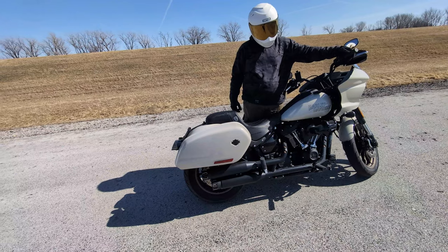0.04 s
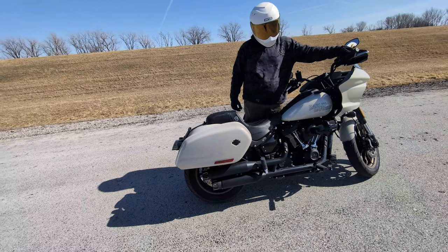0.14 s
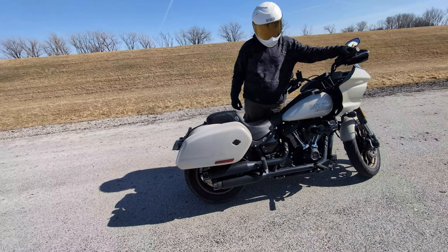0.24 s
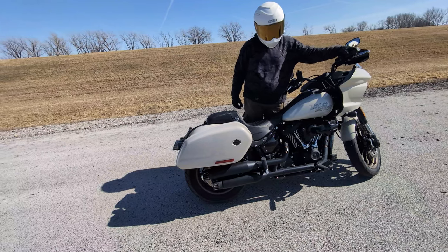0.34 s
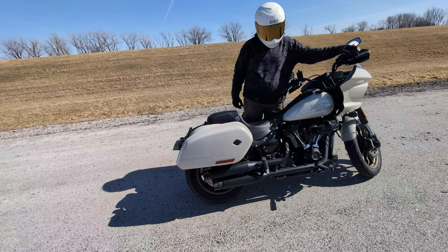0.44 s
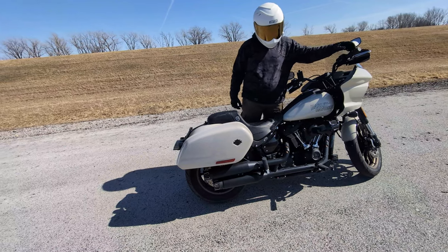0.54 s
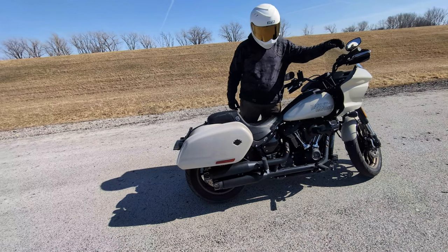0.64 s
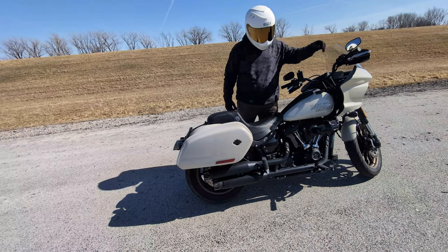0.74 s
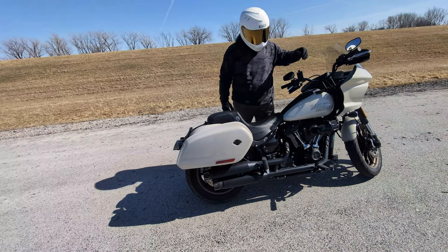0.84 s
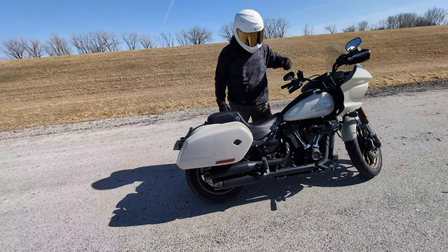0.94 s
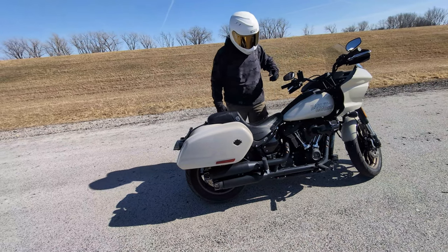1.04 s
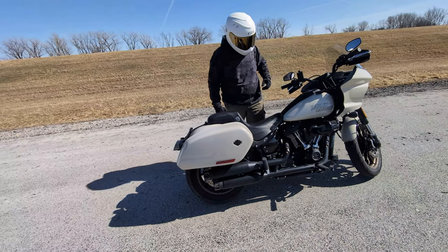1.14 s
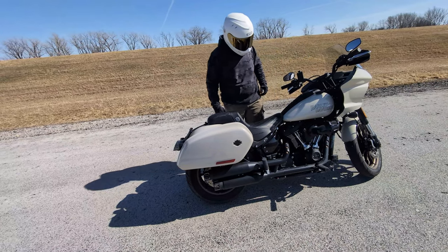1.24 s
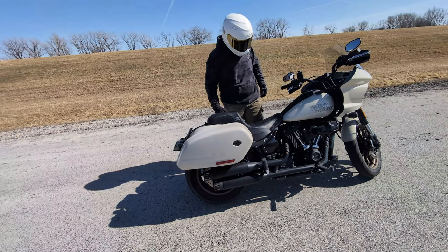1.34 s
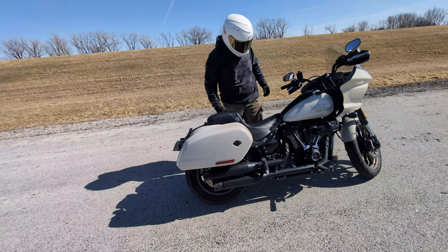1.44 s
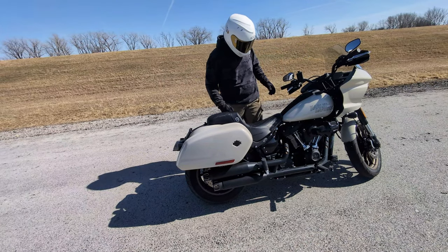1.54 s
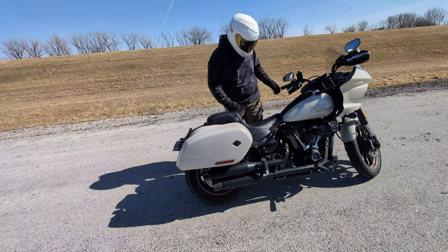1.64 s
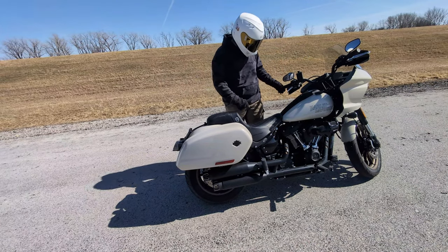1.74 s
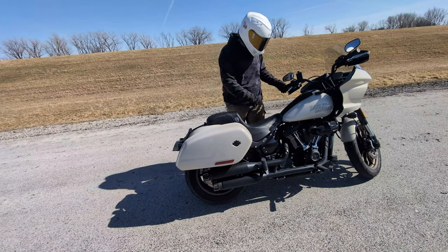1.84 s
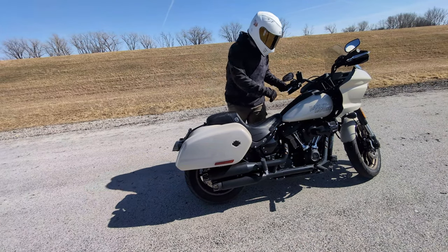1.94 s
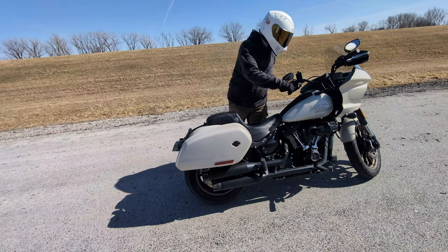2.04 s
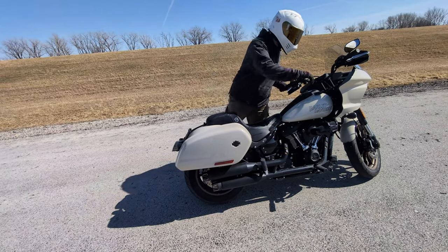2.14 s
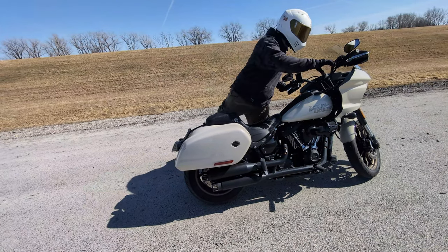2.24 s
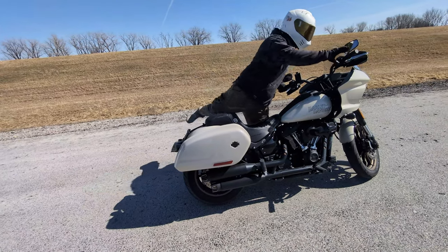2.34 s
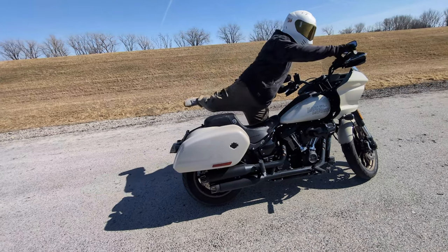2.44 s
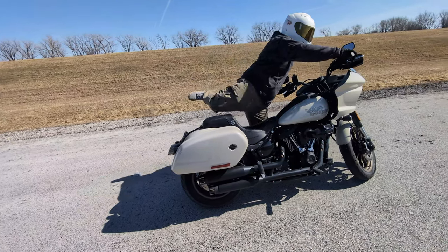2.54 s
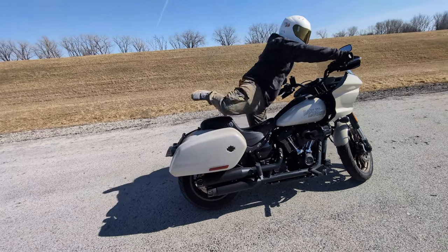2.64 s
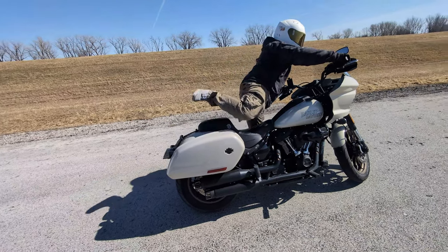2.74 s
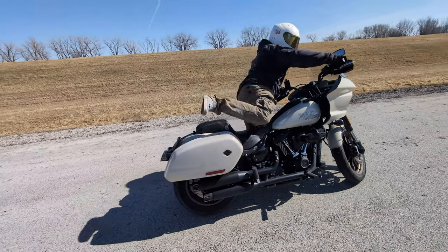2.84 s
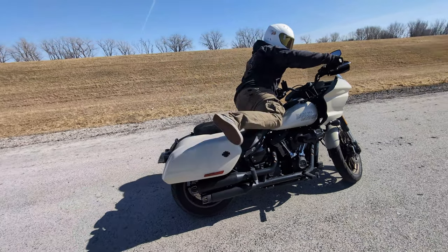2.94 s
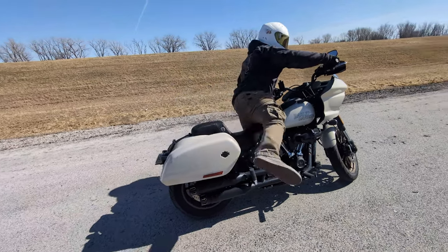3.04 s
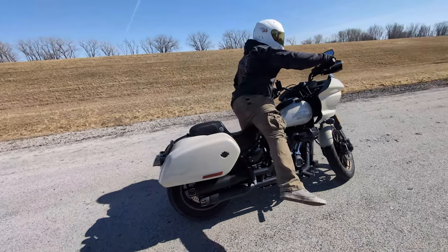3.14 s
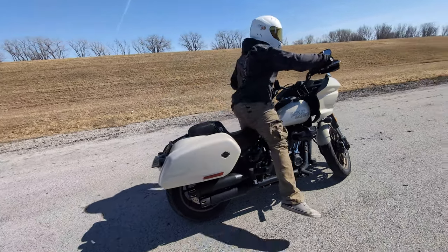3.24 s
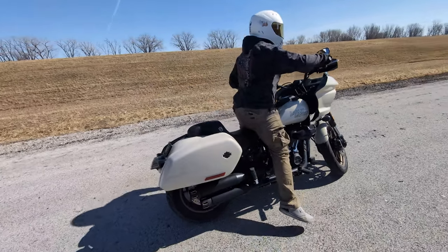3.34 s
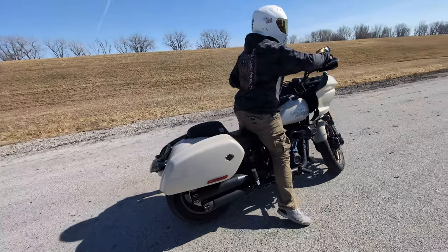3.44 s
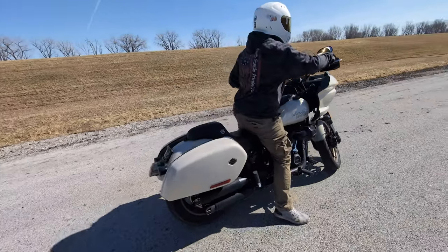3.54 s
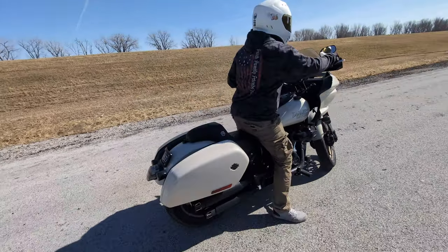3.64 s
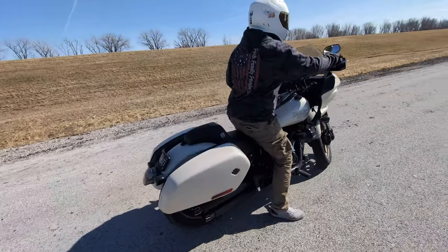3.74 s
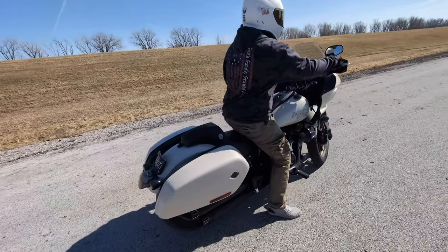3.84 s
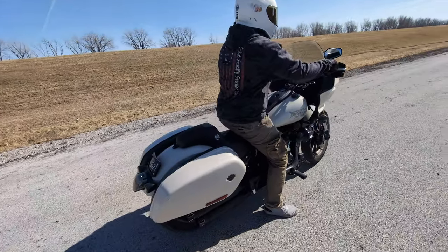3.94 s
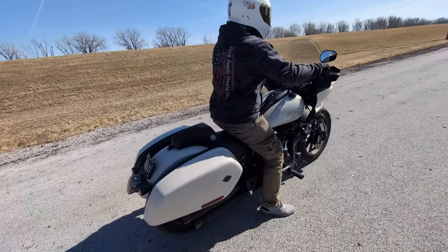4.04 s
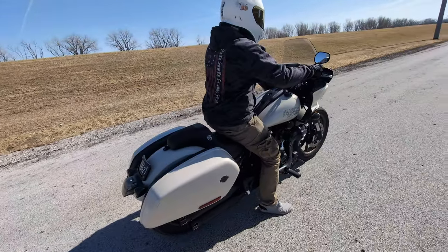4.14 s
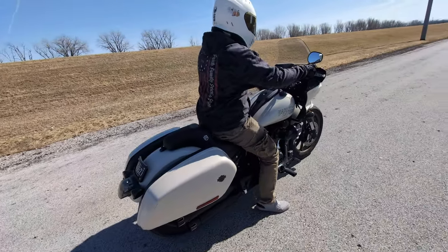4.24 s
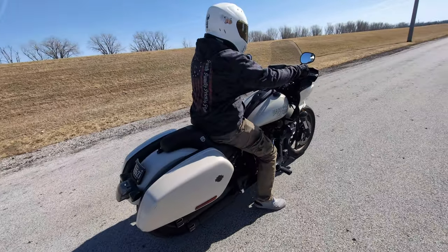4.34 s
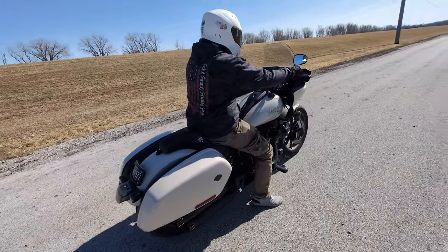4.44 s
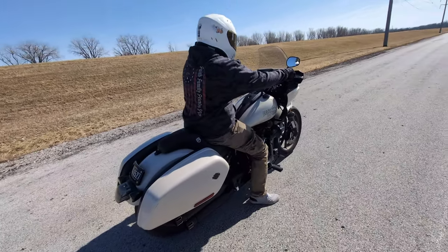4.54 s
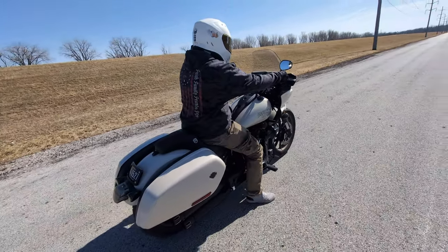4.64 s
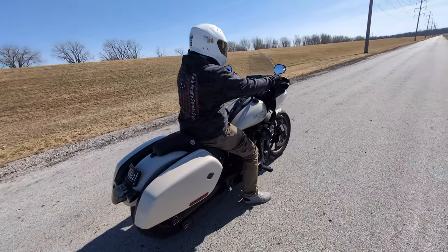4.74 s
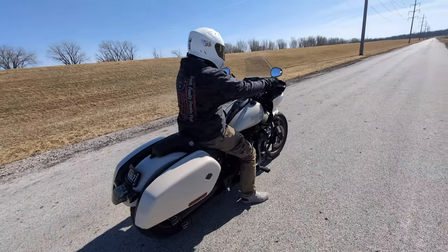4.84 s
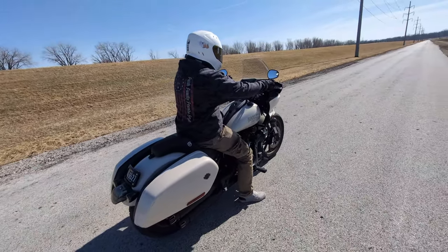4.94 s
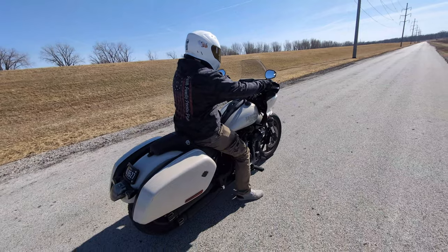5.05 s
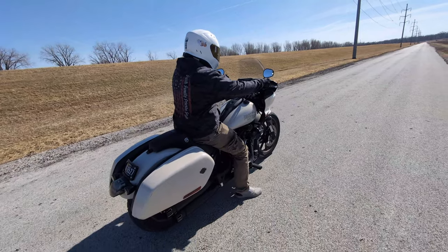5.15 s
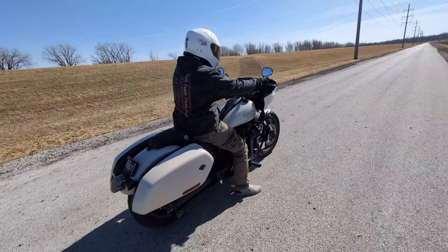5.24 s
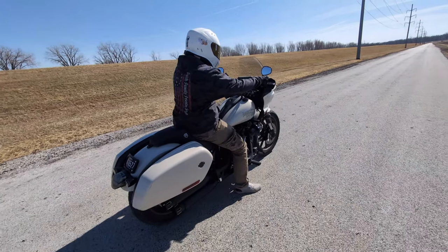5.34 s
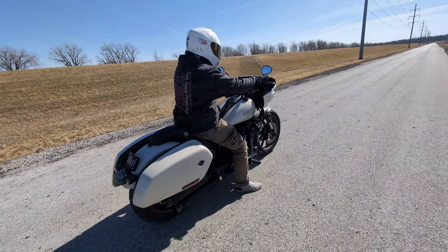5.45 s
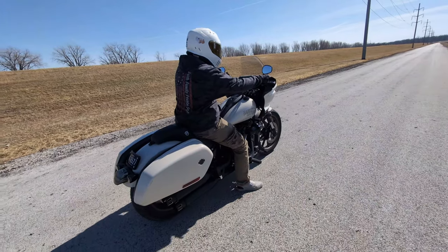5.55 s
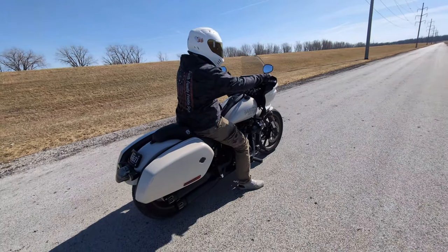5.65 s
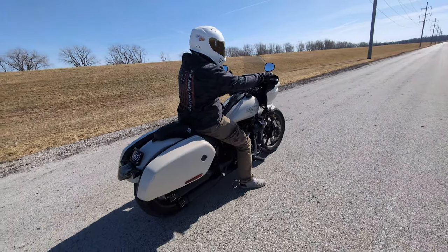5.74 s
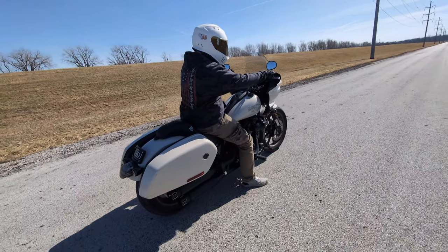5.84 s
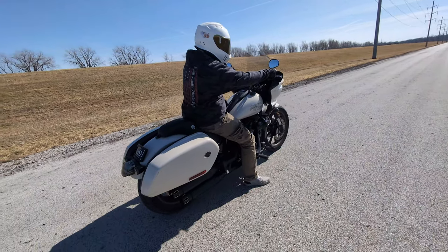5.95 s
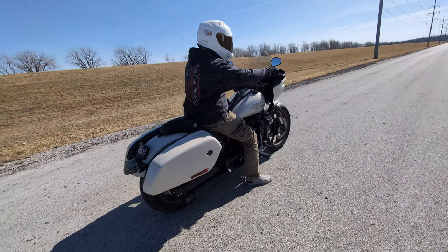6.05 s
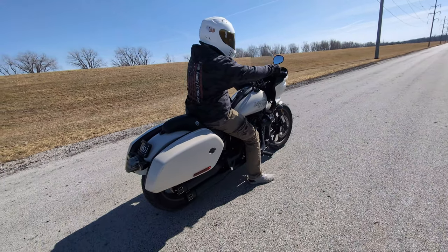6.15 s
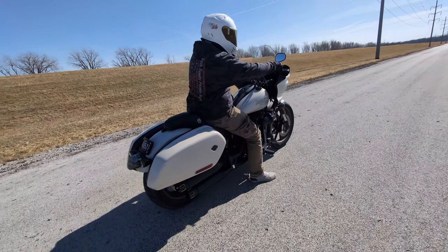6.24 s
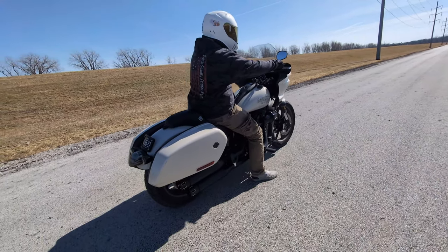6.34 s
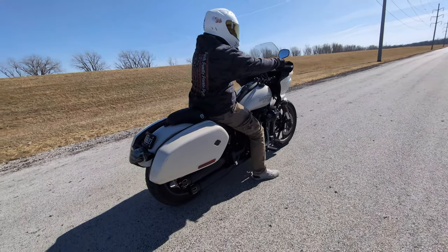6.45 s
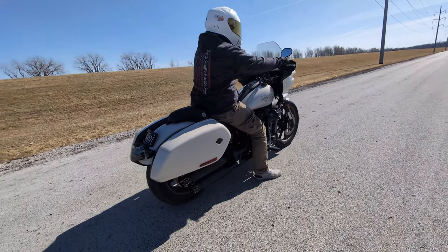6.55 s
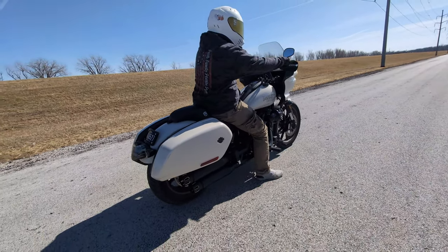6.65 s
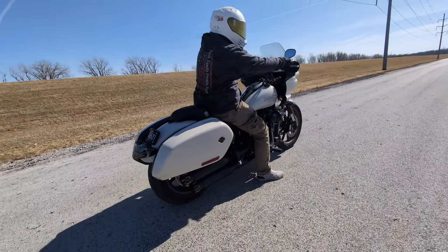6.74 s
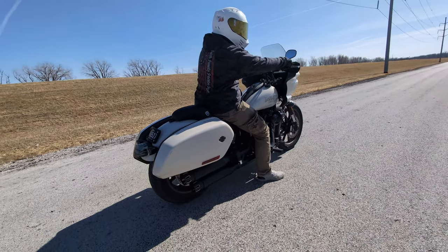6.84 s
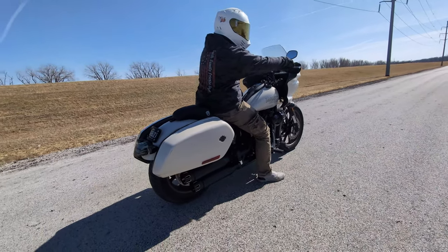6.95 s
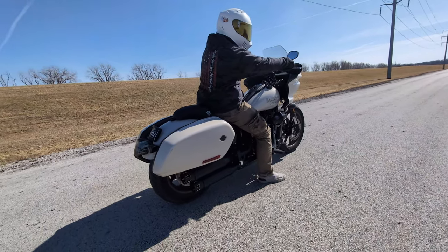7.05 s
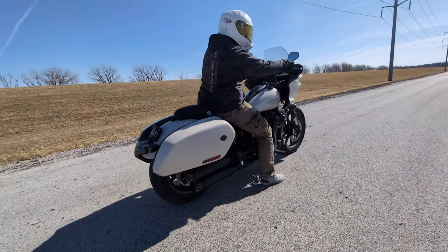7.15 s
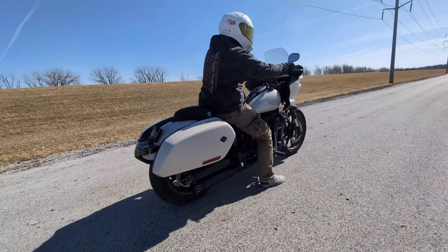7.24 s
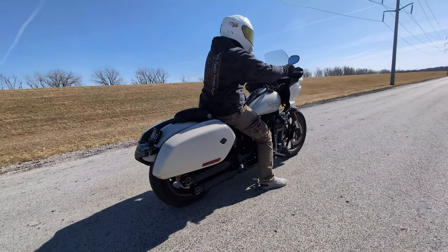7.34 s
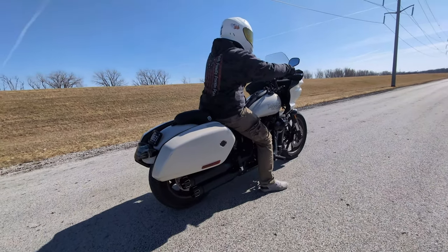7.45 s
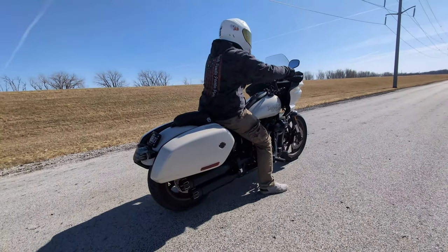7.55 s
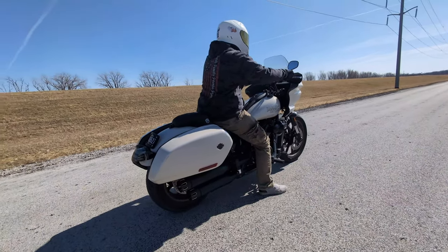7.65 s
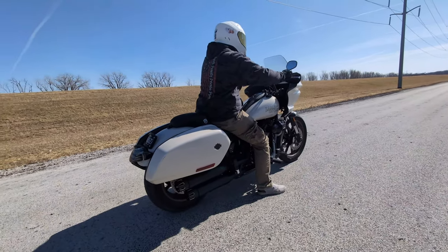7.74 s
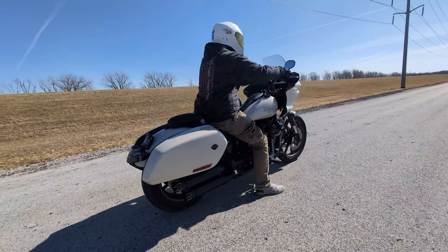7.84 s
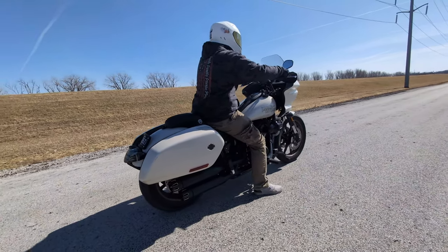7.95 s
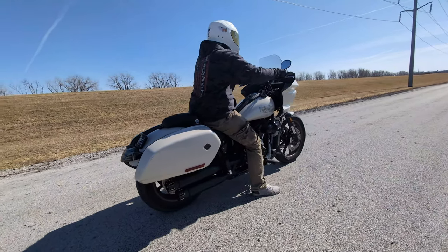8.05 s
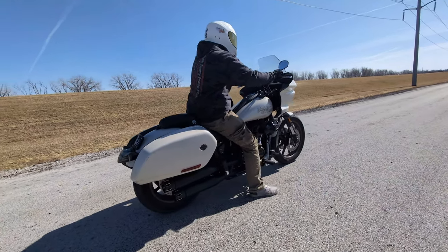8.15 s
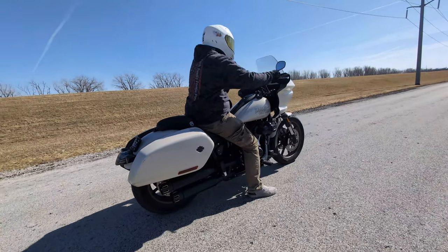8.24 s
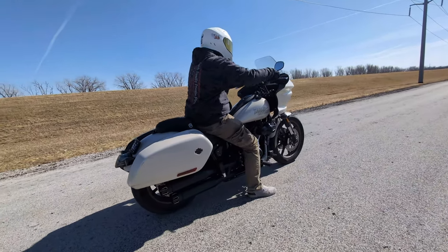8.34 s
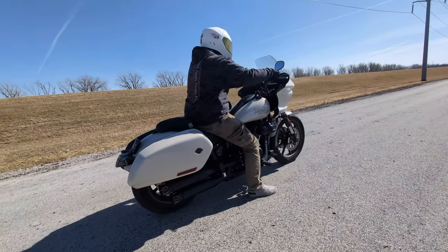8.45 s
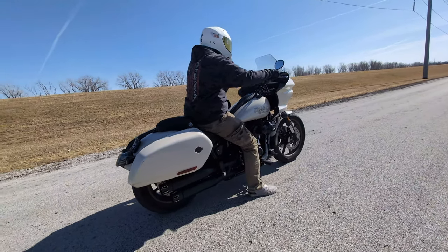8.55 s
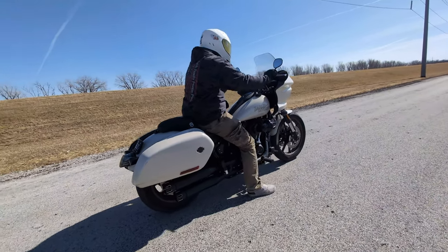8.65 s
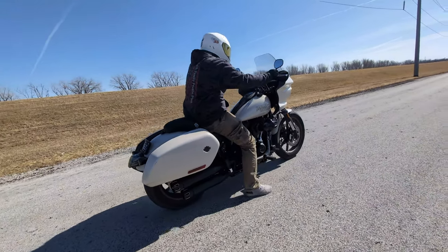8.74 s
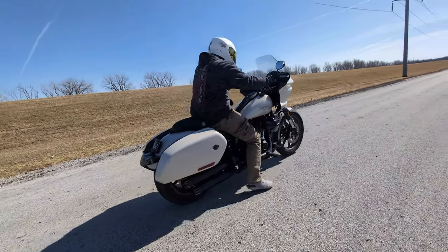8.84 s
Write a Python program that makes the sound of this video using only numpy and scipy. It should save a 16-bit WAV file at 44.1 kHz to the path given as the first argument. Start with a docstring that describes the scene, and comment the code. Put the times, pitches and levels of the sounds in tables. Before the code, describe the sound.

A loud V-twin motorcycle gives one throaty blip, crackles down to a loping idle, clunks into gear, then revs hard with sharp pops.

```python
"""Big V-twin blipped, idling and revved

A V-twin motorcycle with open mufflers is blipped once, sinks to a loping idle, clunks into gear and is revved again.
Two unevenly spaced exhaust pulses ring modelled pipes and merge into a roar; shaped noise makes rush, cracks and pops.
Valves tick and pistons rap as pulsed noise, knocks and the side stand ring briefly, a whine falls, the drive squeals.
Crank speed, throttle and the microphone's line to the pipes set most levels; a limiter turns loud passages down."""
import sys
import numpy as np
from scipy import signal
from scipy.fft import rfft, irfft, next_fast_len
from scipy.io import wavfile
from scipy.ndimage import uniform_filter1d

SR = 44100
rng = np.random.default_rng(int(sys.argv[2]) if len(sys.argv) > 2 else 0)


def bounce(signal):
    """Save signal as a 16-bit WAV file at the path given by the first command-line argument."""
    frames = np.transpose(np.atleast_2d(signal))
    limited = np.clip(frames, -1, 1)
    pcm = np.round(limited * 32767).astype(np.int16)
    wavfile.write(sys.argv[1], SR, pcm)


N = 392049
TIME = np.arange(N) / SR
IDLE_RPM = 980
REAR_LAG = .402   # share of the four-stroke cycle from the front to the rear cylinder


def from_db(db):
    """Turn decibels into a gain."""
    return 10 ** (np.asarray(db) / 20)


def rms_one(x):
    """Scale to unit power."""
    return x / np.sqrt(np.mean(x ** 2) + 1e-20)


def in_time(rows):
    """Read each column of a curve at every sample."""
    s, *columns = np.transpose(rows)
    return [np.interp(TIME, s, column) for column in columns]


def at_hz(points, hz):
    """Read a spectrum in dB; beyond its ends it falls by a further 48 dB per octave."""
    f, value = np.transpose(points)
    octaves_beyond = np.log2(hz / np.clip(hz, f[0], f[-1]))
    return np.interp(np.log(hz), np.log(f), value) - 48 * np.abs(octaves_beyond)


def drift(rate_hz):
    """Wander at random, in straight lines between chance values; spread 1."""
    steps = TIME * rate_hz
    return rms_one(np.interp(steps, np.arange(8192), rng.standard_normal(8192)))


def cut(x, hz, kind, order=2):
    """Butterworth low-pass or high-pass filter."""
    return signal.sosfilt(signal.butter(order, hz, kind, fs=SR, output="sos"), x)


def resonance(x, hz, width_hz):
    """Ring at one pitch: the same two-pole resonance twice over, with gain 1 on top."""
    r = np.exp(-np.pi * width_hz / SR)
    top = np.array([1, 0, -1]) * (1 - r * r) / 2
    bottom = [1, -2 * r * np.cos(2 * np.pi * hz / SR), r * r]
    return signal.lfilter(top, bottom, signal.lfilter(top, bottom, x))


def evened(x, size=5400):
    """Hold the power near 1 over a window of samples, by default one idle cycle."""
    power = uniform_filter1d(uniform_filter1d(x ** 2, size=size), size=size // 2)
    return x / np.sqrt(np.abs(power) + 1e-12)


# How alike left and right are at each pitch: pitch_hz [Hz], likeness [-1 to 1]
LIKENESS = [(60, 0.31), (200, 0.98), (700, 0.74), (1300, 0.72), (2400, 0.16), (4400, -0.13), (8000, -0.026),
            (15000, 0.043)]


def noise(colour, tilt_db=0, size=N):
    """Stereo turbulence of a given colour, rms 1; its likeness between the ears depends on pitch."""
    length = next_fast_len(size, True)
    hz = np.maximum(np.arange(length // 2 + 1) * SR / length, 1)
    alike = np.clip(np.interp(hz, *np.transpose(LIKENESS)), -1, 1)
    mid, side = rfft(rng.standard_normal((2, length)))
    pair = np.sqrt(1 + alike) * mid + np.sqrt(1 - alike) * side * [[1], [-1]]
    shape = from_db(at_hz(colour, hz) + tilt_db * np.log2(hz))
    return rms_one(irfft(pair * shape, length)[:, :size])


def strokes(cycle, start, width, uneven_db):
    """One pulse per engine cycle: a fast rise and slower fall in crank angle, each with its own strength."""
    turn, angle = np.divmod(cycle - start + 2, 1)
    strength = from_db(uneven_db * rng.standard_normal(256))
    u = angle / width
    return strength[turn.astype(int)] * u * u * np.exp(2 - 2 * u)


def burst(s, rise, decay):
    """Envelope of a sudden blow, height 1; rise and decay in seconds."""
    out, first = np.zeros(N), int(s * SR)
    age = TIME[:min(N - first, SR // 4)]
    shape = (1 - np.exp(-(age / rise) ** 2)) * np.exp(-age / decay)
    out[first:first + len(age)] = shape / shape.max()
    return out


# Colour of the low eddies: pitch_hz [Hz], level_db [dB, relative]
RUMBLE = [(20, -20), (40, -38), (80, 7), (200, -0.5), (400, -27)]


def rumble(rush_db):
    """Eddies in the exhaust stream make a low noise."""
    return from_db(rush_db) * noise(RUMBLE)


# Side stand and gearbox knocks: start_s [s], level_db [dB, envelope peak], decay_s [s],
# tilt_db [dB per octave, towards the treble]
KNOCKS = [(5.388, -29.5, 0.007, 3.5), (6.724, -22, 0.0094, -0.2), (6.743, -37.5, 0.059, 0.5),
          (6.773, -32.5, 0.015, 0)]
# Colour of the knocking metal: pitch_hz [Hz], level_db [dB, relative]
KNOCK = [(300, 12), (650, 18.5), (1000, 15), (1700, 14.5), (2200, 9), (3000, 10), (4200, 7), (5500, 4),
         (7000, 1), (15000, -7)]


def knocks():
    """Heavy metal parts meet: dense modes, made as coloured noise, die quickly."""
    out = np.zeros((2, N))
    for s, db, decay, tilt_db in KNOCKS:
        span = slice(int(s * SR), int(s * SR) + SR // 4)
        out[:, span] += from_db(db) * burst(s, 0.00071, decay)[span] * noise(KNOCK, tilt_db, size=SR // 4)
    return out


# Side stand ringing as it snaps up: pitch_hz [Hz], level_db [dB], decay_s [s]
STAND = [(1100, -32, .008), (1230, -44, .012), (2920, -31, .007), (3200, -42, .014), (5480, -32, .005),
         (5700, -51, .012)]


def side_stand(s=5.389):
    """The stand's spring pulls it against its stop, and a few tones ring briefly."""
    return sum(from_db(db) * burst(s, 0.0017, decay) * np.sin(2 * np.pi * hz * TIME + drift(190))
               for hz, db, decay in STAND)


# The drive squeals as the load comes on: start_s [s], length_s [s], level_db [dB]
SQUEALS = [(8.654, 0.041, -12.5), (8.68, 0.1, -20.5), (8.779, 0.0386, -15.5), (8.796, 0.19, -14)]
SQUEAL_HZ, SQUEAL_SAG_HZ = 1344, 99.7   # pitch when barely gripping; its fall at the hardest grip


def squeal(rough=0.0302, octave_db=-12):
    """Rubber sticks and slips under load: a rough tone with its octave, flatter the harder it grips."""
    grip = sum(from_db(db) * np.sin(np.pi * np.clip((TIME - s) / length, 0, 1)) for s, length, db in SQUEALS)
    hz = SQUEAL_HZ - SQUEAL_SAG_HZ * grip / grip.max()
    phase = 2 * np.pi * np.cumsum(hz * (1 + rough * drift(350))) / SR
    octave = from_db(octave_db + 3 * drift(90)) * np.sin(2 * phase + drift(500))
    return grip * from_db(2 * drift(150)) * rms_one(np.sin(phase) + octave)


# A whine falls as the engine winds down: start_s [s], pitch_hz [Hz], level_db [dB, before the casing]
WHINE = [(1.25, 2395, -53), (1.5, 2050, -51), (1.65, 1845, -61), (1.8, 1650, -51), (1.9, 1540, -57),
         (2.05, 1350, -83)]
# The casing that its harmonics glide through: pitch_hz [Hz], level_db [dB]
CASING = [(1400, -3), (1680, 1.5), (2000, -1), (3400, -17), (4050, -10), (4700, -25), (5600, 4),
          (6400, -22), (7500, -14), (8500, -22)]


def whine(rough=.026, flutter_db=2):
    """A rough, fluttering tone slides down; its harmonics light up in turn."""
    hz, db = in_time(WHINE)
    phase = 2 * np.pi * np.cumsum(hz * (1 + rough * drift(500))) / SR
    tone = sum(from_db(at_hz(CASING, k * hz)) * np.sin(k * phase) for k in range(1, 5))
    sounding = (TIME > WHINE[0][0]) & (TIME < WHINE[-1][0])
    return sounding * from_db(db + flutter_db * drift(50.4)) * tone


# Colour of the valve ticks: pitch_hz [Hz], level_db [dB, relative]
TICK = [(2000, -29), (3200, 10), (4500, 2.5), (6500, 0), (8200, 6.5), (9500, 4), (11400, 15.5),
        (13000, 5.5), (16000, -2)]


def valves(cycle, level_db):
    """The valve train ticks at fixed cam angles, as gated noise."""
    # (place in the cycle, length as a share of the cycle, dB)
    cams = [(0.0007, 0.026, 17.2), (0.373, 0.058, 12.0), (0.11, 0.018, 7.1)]
    gate = sum(from_db(db) * strokes(cycle, start, width, uneven_db=-3.0) for start, width, db in cams)
    return from_db(level_db) * rms_one(gate) * noise(TICK)


def clatter(cycle, rush_db, level_db=-14.0, start=0.0014, width=0.019):
    """Pistons and rockers rap on the finned cylinders; level_db is relative to the rush."""
    front = strokes(cycle, start, width, 3)
    rear = from_db(-3) * strokes(cycle, start + REAR_LAG, width, 3)
    # (Hz, dB)
    fins = [(1200, 13), (1650, -7.5), (2000, 2.0), (2500, 5.0), (3000, 1), (3400, 2.0), (4200, -18.0)]
    return from_db(rush_db + level_db) * rms_one(front + rear) * noise(fins)


def tappets(cycle, level_db, knock_db=-3, width_hz=260):
    """Closing valves knock on the heads; fresh noise in each mode makes every knock favour others."""
    gate = strokes(cycle, .985, .012, 4) + .6 * strokes(cycle, .42, .014, 5)
    rings = sum(resonance(gate * rng.standard_normal((2, N)), hz, width_hz) for hz in (2150, 2850, 3300))
    return from_db(level_db + knock_db) * rms_one(rings)


# Colours of the lower and the upper exhaust turbulence: pitch_hz [Hz], level_db [dB, relative]
RUSH = [(180, 17), (300, 0.5), (458, -8), (637, -4), (751, -13.5), (1200, -9), (1380, -5), (1470, -13.5),
        (1600, -9), (2120, -17.5), (2410, -13), (3600, -20), (5000, -26.5), (6500, -77), (11000, -120)]
HISS = [(2060, 8), (3500, -21), (3780, -3.5), (5750, 3.5), (6780, -1.5), (8690, -3), (11400, 1.5),
        (15100, -4), (16000, -26)]


def jet(cycle, rush_db, hiss_db, opens=0.32, width=0.29, rush_depth=0.48, hiss_depth=0.33):
    """Turbulence at the pipe ends swells with every puff."""
    puffs = strokes(cycle, opens, width, 1) + strokes(cycle, opens + REAR_LAG, width, 2.5)
    rush = from_db(rush_db + 5.5) * rms_one(1 + rush_depth * puffs) * noise(RUSH)
    hiss = from_db(hiss_db + 2.0) * rms_one(1 + hiss_depth * puffs) * noise(HISS)
    return rush + hiss


# Muffler can resonances: pitch_hz [Hz], width_hz [Hz, of one pass], level_db [dB, relative]
CAN = [(555, 170, 6), (628, 81, 5.5), (770, 82, -5)]


def cans(cycle, level_db, knock_db=-7, knock_hz=630, knock_width_hz=125, gas_db=-3.0, steady=0.23,
         uneven_db=3.5):
    """The gas front knocks on the muffler cans, the front cylinder hardest; the flow keeps them humming."""
    blows = [(.405, 0), (.735, -6), (.955, -9), (.13, -12)]   # (place in the cycle, dB)
    clicks = 0
    for at, db in blows:
        passing = np.diff(np.floor(cycle - at), prepend=np.floor(cycle[0] - at))
        clicks = clicks + from_db(db + uneven_db * drift(15)) * passing
    knock = resonance(clicks + 1e-18, knock_hz, knock_width_hz)
    flow = steady + sum(from_db(db) * strokes(cycle, at, 0.034, 1.5) for at, db in blows)
    gas = flow * rng.standard_normal(N)
    hum = sum(from_db(db) * resonance(gas, hz, width_hz) for hz, width_hz, db in CAN)
    return from_db(level_db) * (from_db(knock_db) * evened(knock) + from_db(gas_db) * evened(hum))


# The sharpest pops ring the mufflers: start_s [s], level_db [dB, envelope peak], pitch_hz [Hz]
POPS = [(0.363, -22.5, 2500), (0.393, -23.5, 1700), (0.425, -19, 670), (0.474, -24.5, 820),
        (0.447, -31, 606), (0.495, -19.5, 706), (0.52, -27, 840), (0.574, -30, 795), (0.681, -32, 2680),
        (0.727, -30, 2480), (0.754, -28, 880), (0.868, -28, 557), (7.449, -25, 1700), (7.517, -24, 667),
        (7.597, -24.5, 2100), (7.812, -22, 1360), (7.874, -18.5, 1190), (7.924, -28, 940),
        (8.127, -26, 1950), (8.183, -27, 1290), (8.249, -15, 1200), (8.277, -14.5, 700), (8.317, -17, 1240),
        (8.333, -20, 1180), (8.354, -11.5, 1230)]


def pops(rise=0.001, decay=0.0065, skirt_db=-11):
    """A sharp pop leaves a short, rough ring: a burst of noise around one pitch."""
    out = np.zeros((2, N))
    for s, db, hz in POPS:
        span = slice(int(s * SR), int(s * SR) + SR // 4)
        colour = [(hz / 1.35, skirt_db), (hz, 0), (hz * 1.35, skirt_db)]
        out[:, span] += from_db(db) * burst(s, rise, decay)[span] * noise(colour, size=SR // 4)
    return out


# Where the two cylinders crack: one share of the four-stroke cycle each [0 to 1]
CRACK_ANGLES = (.467, .042)
# Colours of the crack's jet and of its bark: pitch_hz [Hz], level_db [dB, relative]
CRACK_FIZZ = [(2500, -27), (4000, -4.5), (6000, -1), (8000, -1.5), (11500, 4.5), (14000, 1.5), (16000, -13)]
CRACK_BARK = [(250, 15.5), (400, -11), (700, 0.5), (1000, -8), (1400, -7.5), (2200, -8.5), (3200, -8),
              (4500, -32)]


def cracks(cycle, filling, level_db, fizz_db=-4, bark_db=-4, fizz_decay=0.0032, bark_decay=0.0053,
           lead=0.0003, uneven_db=2.5, bark_follows=0.76):
    """Each charge, the fuller the harder, leaves as a steep front: a bark with a fizzing jet on top."""
    angles = np.add.outer(np.arange(1, int(cycle[-1]) + 1), CRACK_ANGLES).ravel()
    firings = np.searchsorted(cycle, angles[angles < cycle[-1]])
    sizes = from_db(level_db[firings] + uneven_db * rng.standard_normal(len(firings)))
    fizz, bark = np.zeros(N), np.zeros(N)
    for i, size in zip(firings, sizes):
        charge = filling[i]
        if charge > .04:   # weaker charges do not crack
            fizz += size * charge * burst(i / SR + lead / 2, 0.0013, fizz_decay)
            bark += size * charge ** bark_follows * burst(i / SR - lead / 2, 0.0013, bark_decay)
    return from_db(fizz_db) * fizz * noise(CRACK_FIZZ) + from_db(bark_db) * bark * noise(CRACK_BARK)


# Where the front and the rear thump leave the pipes: one share of the cycle each [0 to 1]
THUMP_ANGLES = (.352, .864)
# Exhaust pipe resonances: pitch_hz [Hz], width_hz [Hz, of one pass],
# front_db [dB, front cylinder, relative], rear_db [dB, rear cylinder, relative]
PIPE = [(61.2, 12, -25, 4.6), (90.7, 12, 11.2, 10.9), (90, 18.4, 7.6, 10.8), (160, 30, 3, -2),
        (178, 110, -3, -12), (215, 70, -2.5, -9), (130, 36, -5, -3)]


def pipes(cycle, boom_db, bark_db, uneven_db=1.5, churn=0.078):
    """Each cylinder's blow-down sets the deep modes of the pipes booming and the upper ones barking."""
    early = SR // 5
    cycle = np.r_[cycle[0] + np.linspace(-3, 0, early), cycle]   # the engine is already running
    front, rear = [strokes(cycle, start, .018, uneven_db) for start in THUMP_ANGLES]
    eddies = churn * rms_one(cut(rng.standard_normal(len(cycle)), 185, "low")) / 2
    rings = []
    for k, (hz, width_hz, front_db, rear_db) in enumerate(PIPE):
        push = from_db(front_db) * (front + eddies) + from_db(rear_db) * rear
        rings.append(resonance(push, hz, width_hz) * (-1) ** (k + 1))   # neighbours swing opposite ways
    deep = evened(cut(sum(rings[:3]), 47, "high", order=6))[early:]
    upper = evened(cut(sum(rings[3:]), 47, "high", order=6))[early:]
    return from_db(boom_db) * deep + from_db(bark_db) * upper


# Level of the roar's registers, first blip and later revs:
# start_s [s], low_db [dB], middle_db [dB], high_db [dB], all before each register's own level
BLIP = [(0, -17.5, -28, -39), (.15, -11.5, -19, -58), (.33, -12, -24.5, -44), (.4, -18, -18.5, -33),
        (.52, -10.5, -19.5, -21), (.62, -15.5, -21, -45), (.85, -16, -24.5, -49), (1.2, -17, -24.5, -56),
        (1.5, -23.5, -29.5, -70), (1.82, -21, -37, -68), (1.95, -26, -34, -62)]
REVS = [(7.36, -20, -26, -50), (7.48, -16, -24.5, -27), (7.64, -17, -26.5, -36), (7.8, -10.5, -23, -48),
        (7.87, -17.5, -19, -30), (7.95, -9.5, -17, -17), (8.17, -14.5, -22.5, -42),
        (8.31, -9.5, -12.5, -23), (8.42, -11, -6, -14.5), (8.62, -16, -13.5, -28), (8.75, -12.5, -15, -26),
        (8.89, -12, -16, -25)]
# The registers: pitch_hz [Hz], width_hz [Hz, of one pass], lead_s [s, before the thump],
# rear_share [rear cylinder's strength against the front], level_db [dB]
ROAR = [(74, 49.6, 0.01247, 0.56, 0.5), (149, 58, 0.0032, 0.56, -1.5), (298, 138, 0.00076, 0.66, -4.5)]


def roar(cycle, rpm, uneven_db=1.0, churn=.08):
    """Above idle the pulses run together; their harmonics glide through three broad pipe resonances."""
    out = 0
    start = THUMP_ANGLES[0]
    for (hz, width_hz, lead, rear, db), level_db in zip(ROAR, in_time(list(BLIP) + list(REVS))):
        early = cycle + lead * rpm / 120   # one cycle is two turns
        puffs = strokes(early, start, .016, uneven_db)
        puffs = puffs + rear * strokes(early, start + REAR_LAG, .016, uneven_db)
        eddies = rms_one(cut(rng.standard_normal(N), 330, "low"))
        gas = puffs + churn * np.sqrt(puffs + 0.06) * eddies
        out = out + from_db(db + level_db) * evened(resonance(gas, hz, width_hz), size=4400)
    return out


# Twists of the throttle: open_s [s], close_s [s], opening [0 to 1]
THROTTLE = [(0.35, 0.473, 0.36), (7.39, 7.469, 0.66), (7.587, 7.602, 0.37), (7.8, 7.876, 0.73),
            (8.106, 8.195, 0.18), (8.199, 8.348, 0.52), (8.674, 8.867, 0.55)]
THROTTLE_OPEN_S, THROTTLE_RELEASE_S = 0.0049, 0.034


def throttle():
    """Opening 0-1: each twist opens quickly, holds and dies away as the manifold empties."""
    twists = []
    for start, end, amount in THROTTLE:
        opened = np.clip((TIME - start) / THROTTLE_OPEN_S, 0, 1)
        twists.append(amount * opened * np.exp(-np.maximum(TIME - end, 0) / THROTTLE_RELEASE_S))
    return np.max(twists, axis=0)


# Gain as the microphone comes into line with the pipes: start_s [s], aim_db [dB, before each part's share]
AIM = [(0, -1.5), (1.2, -6), (2.4, -4.5), (3.1, -2), (3.8, -0.3), (7.3, 1), (8.89, -1.5)]
# Loudness of the parts, by name: idle_db [dB at idle], speed_db [dB per doubling of crank speed],
# load_db [dB added at full throttle], aim_share [share of the aim felt]
LAW = {"boom": (-15.5, 31, 11, 2), "bark": (-26.5, 19, -2, 2), "tappet": (-56, 10, -6, 1.5),
       "can": (-43, 5, -13, 1.48), "rush": (-44, 11.5, -4.5, 1.52), "hiss": (-57, 12.5, 2, 0.56),
       "tick": (-51.5, 1, 21.5, 2.1), "crack": (-16.5, 8, 0.5, 0.44)}


def loudness(rpm, opening):
    """Set the named parts' levels in dB from crank speed, throttle and the microphone's place."""
    doublings, aim_db = np.log2(rpm / IDLE_RPM), in_time(AIM)[0]
    return {part: idle_db + speed_db * doublings + load_db * opening + share * aim_db
            for part, (idle_db, speed_db, load_db, share) in LAW.items()}


# Crankshaft speed: start_s [s], speed_rpm [revolutions per minute]
SPEED = [(0, 2023), (.2, 1950), (.35, 1716), (.45, 2376), (.53, 2782), (.75, 2430), (.95, 2041),
         (1.15, 1925), (1.35, 1549), (1.55, 1601), (1.85, 1123), (2.04, 1001.8), (4.31, 983.5),
         (4.6, 974.6), (6.01, 975.9), (6.39, 956.5), (7.36, 968.7), (7.42, 1355), (7.5, 1904), (7.65, 1403),
         (7.79, 1755), (7.87, 2125), (7.94, 2718), (8.1, 2158), (8.21, 2320), (8.3, 2771), (8.39, 3650),
         (8.5, 3500), (8.65, 3100), (8.73, 2570), (8.89, 2700)]
START_ANGLE = .185   # share of the four-stroke cycle already turned at the start
COAST_CHARGE = 0.057   # cylinder filling with the throttle shut, per doubling of speed
DRONE_FROM_RPM, DRONE_FULL_RPM = 1000, 1236   # the thumps merge into a roar between these speeds


def scene(beat=0.26, beat_angle=0.52, lope=0.0107):
    """The crank angle drives the engine's pulses; at idle the crank turns a little unevenly."""
    rpm, opening = in_time(SPEED)[0], throttle()
    merged = np.clip((rpm - DRONE_FROM_RPM) / (DRONE_FULL_RPM - DRONE_FROM_RPM), 0, 1)
    cycle = START_ANGLE + np.cumsum(rpm) / (120 * SR)   # counts four-stroke cycles
    cycle = cycle + lope * (1 - merged) * drift(9)
    db = loudness(rpm, opening)
    charge = np.maximum(opening, COAST_CHARGE * np.log2(rpm / IDLE_RPM))

    engine = valves(cycle, db["tick"]) + clatter(cycle, db["rush"]) + tappets(cycle, db["tappet"]) + whine()
    beating = 1 + beat * np.cos(2 * np.pi * (cycle - beat_angle))
    thumps = (1 - merged) * beating * pipes(cycle, db["boom"], db["bark"])
    bass = thumps + np.sqrt(merged) * roar(cycle, rpm)
    gas = jet(cycle, db["rush"], db["hiss"]) + cracks(cycle, charge, db["crack"]) + pops()
    exhaust = bass + cans(cycle, db["can"]) + gas
    return rumble(db["rush"]) + knocks() + side_stand() + squeal() + engine + exhaust


LIMIT_DB, LIMIT_WINDOW_S, LOW_CUT_HZ = -14.5, 0.08, 56.6


def limiter(x, treble_db=6):
    """Turn the gain down when the power, with the treble weighted up, passes a soft ceiling."""
    mid = x.mean(axis=0)
    power = mid ** 2 + (from_db(treble_db) * cut(mid, 870, "high")) ** 2
    size = int(LIMIT_WINDOW_S * SR)
    smooth = uniform_filter1d(uniform_filter1d(power, size=size), size=size // 2)
    over = smooth / from_db(LIMIT_DB) ** 2
    return x / (1 + over ** 4) ** (1 / 8)


def record(dry):
    """Cut the lowest bass, favour the right a little, limit, round the highest peaks and cut the top."""
    x = cut(dry, LOW_CUT_HZ, "high", order=4) * from_db([[-.45], [.45]])
    x = limiter(x)
    x = x / (1 + (np.abs(x) / .54) ** 8) ** (1 / 8)
    # 70 dB down from 17200 Hz up
    return signal.sosfilt(signal.cheby2(16, 70, 17200, fs=SR, output="sos"), x)


dry = scene()
out = record(dry)
bounce(out)
```